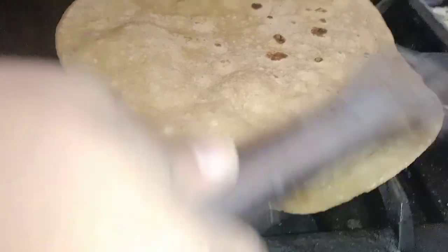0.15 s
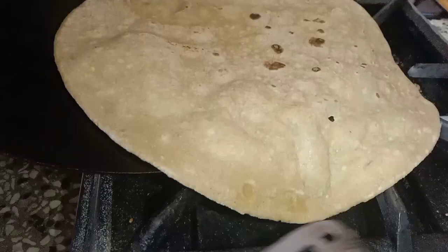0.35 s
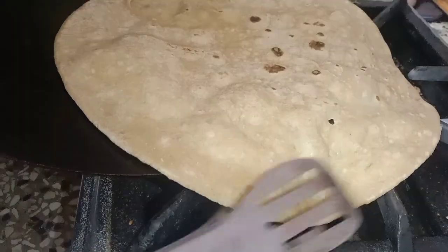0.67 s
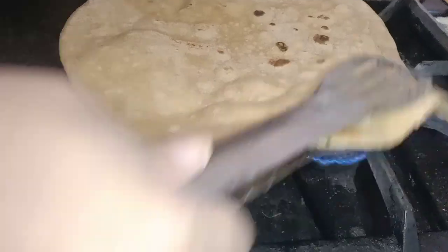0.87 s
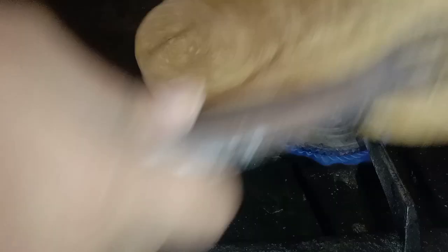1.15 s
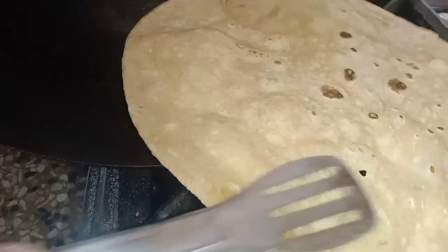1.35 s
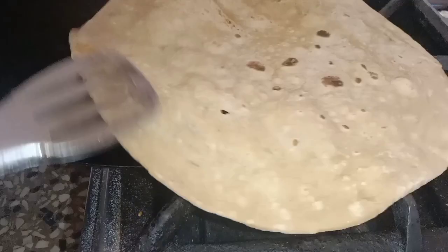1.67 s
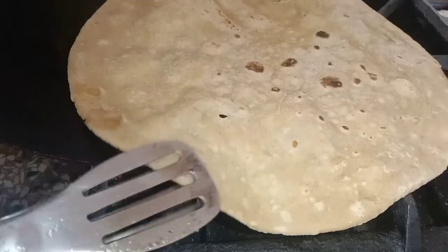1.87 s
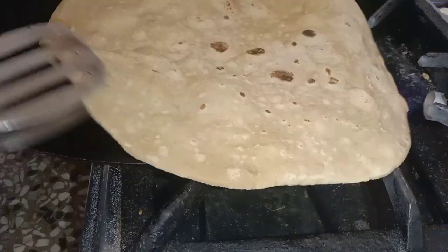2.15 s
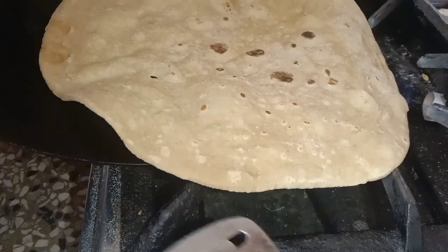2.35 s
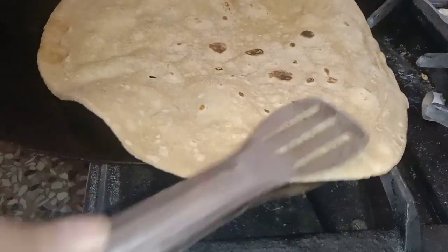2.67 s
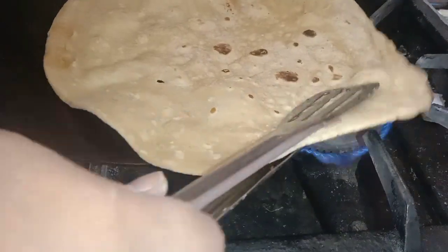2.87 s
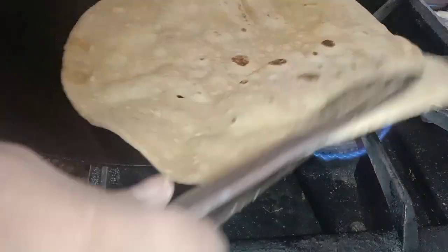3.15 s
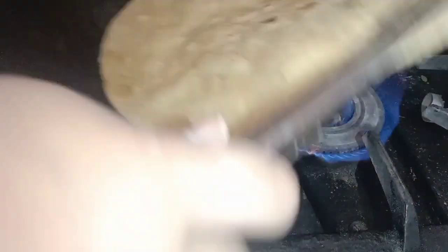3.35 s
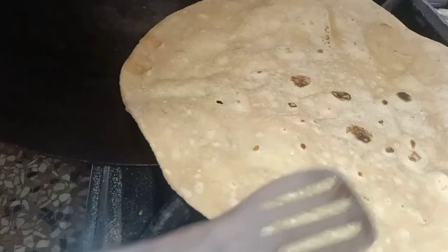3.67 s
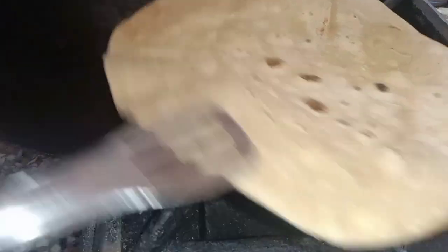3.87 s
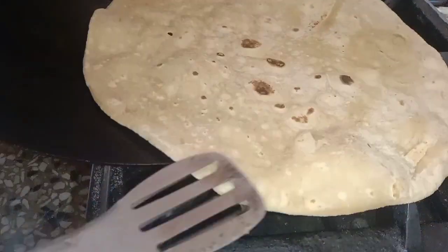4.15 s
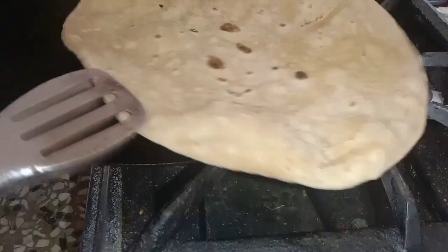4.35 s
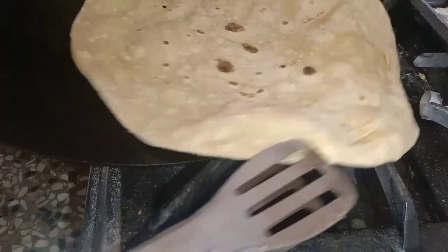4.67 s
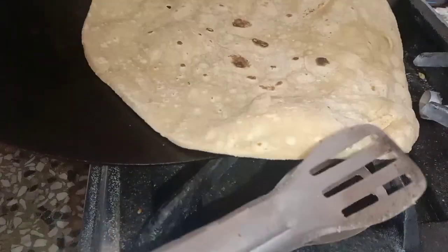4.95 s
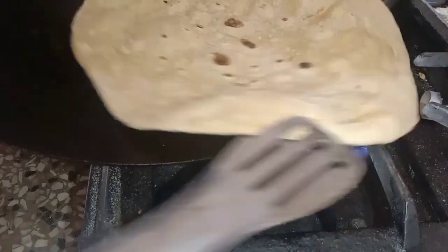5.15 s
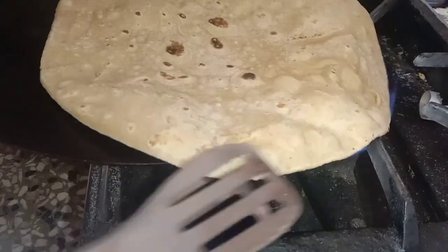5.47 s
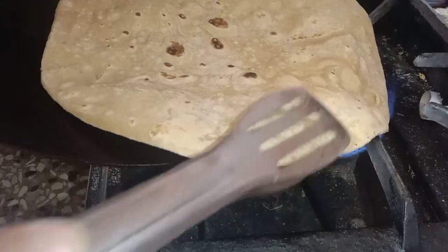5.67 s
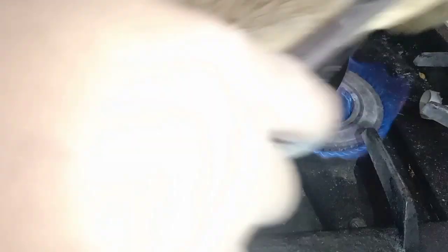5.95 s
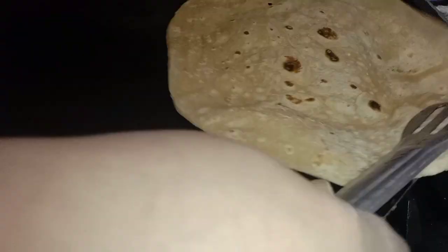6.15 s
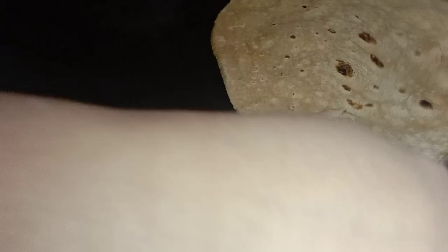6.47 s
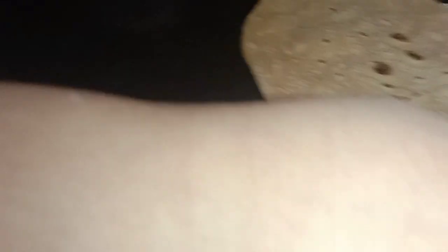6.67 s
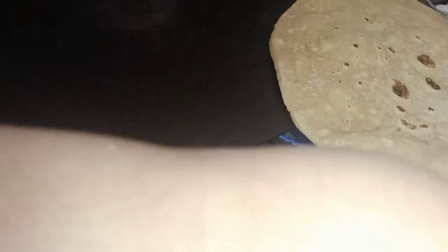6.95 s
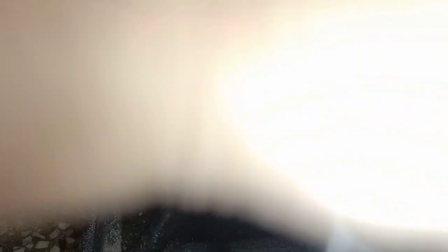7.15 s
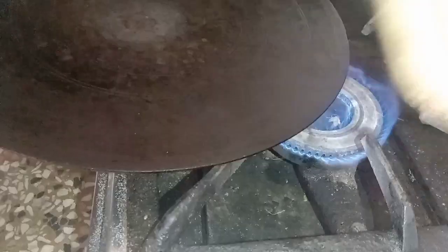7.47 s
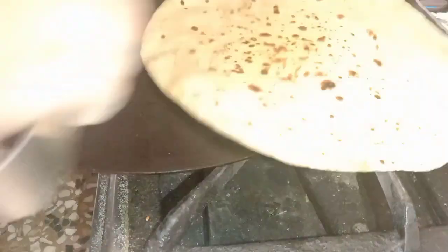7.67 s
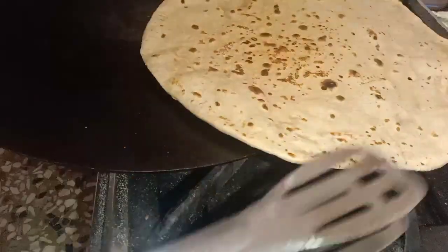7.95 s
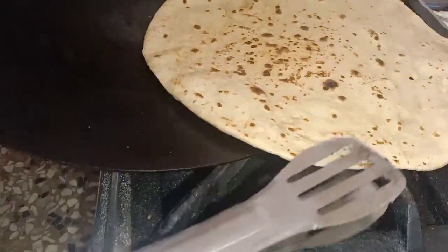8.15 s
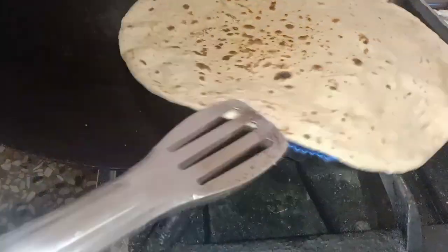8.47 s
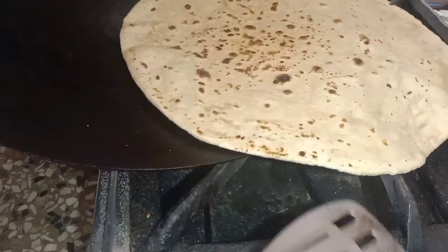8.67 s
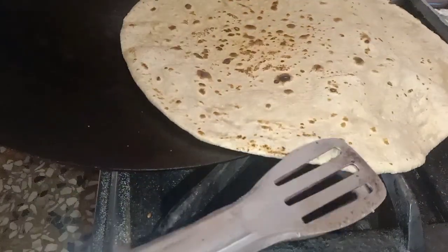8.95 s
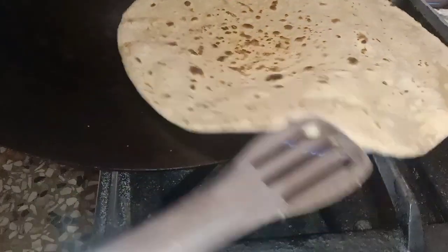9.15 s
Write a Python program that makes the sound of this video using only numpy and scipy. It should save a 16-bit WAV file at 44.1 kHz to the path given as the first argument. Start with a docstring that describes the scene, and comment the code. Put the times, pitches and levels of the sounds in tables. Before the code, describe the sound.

Close dry scrapes, bright spatula clacks and dull griddle thuds as flatbread is turned, while a gas burner hisses and flutters underneath.

```python
"""Spatula and flatbread on an iron griddle

A steel spatula drags a dry flatbread over an iron griddle, skids and taps on the metal, close to a phone.
Grit is random ticks and noise; blade and plate are banks of short decaying modes driven by it.
Skids and taps are chatter bursts; the flame flutters and the plate thuds as swells of low noise.
The gas jet is shaped noise hissing through the burner's resonances.
"""
import sys
import numpy as np
from scipy import signal
from scipy.fft import rfft, irfft, next_fast_len
from scipy.io import wavfile
from scipy.ndimage import uniform_filter1d

SR = 44100
rng = np.random.default_rng(int(sys.argv[2]) if len(sys.argv) > 2 else 0)


def digitize_waveform(pressure):
    """Quantize a signal to 16-bit integers and store it at the path in sys.argv[1].

    Rows of a 2-D input are taken as channels; values are limited to [-1, 1].
    """
    field = np.atleast_2d(pressure).T
    bounded = np.clip(field, -1, 1)
    quanta = np.round(bounded * 32767).astype(np.int16)
    wavfile.write(sys.argv[1], SR, quanta)


N = 410350


# Strokes of bread and blade over the plate, levels before trim:
# (peak time [s], grit level [dB], plate drive level [dB], swell time [s], fade time [s])
STROKES = [(0.9, -40.5, -60.5, 0.97, 0.76), (1.14, -20.5, -43, 0.085, 0.074), (1.28, -27, -54, 0.1, 0.13),
           (1.359, -30.5, -35, 0.13, 0.036), (1.51, -39, -47.5, 0.1, 0.13),
           (1.691, -27.5, -34.5, 0.13, 0.11), (1.81, -39, -72, 0.18, 0.051),
           (2.139, -26, -34, 0.071, 0.087), (2.3, -39, -64, 0.26, 0.11), (2.815, -36, -47.5, 0.025, .07),
           (2.922, -25.5, -26.5, 0.062, 0.058), (3.14, -30.5, -34.5, 0.06, .1),
           (3.42, -36, -52.5, 0.13, 0.23), (3.57, -27, -35, 0.068, 0.11), (3.99, -28.5, -40, 0.21, 0.36),
           (4.38, -30, -37.5, 0.13, .12), (4.62, -37.5, -50.5, 1, 0.093), (4.8, -43, -53, 0.26, 0.19),
           (5.32, -29.5, -39, 0.12, .12), (5.789, -31.5, -35, 0.056, 0.44),
           (6.038, -13.5, -34.5, .05, 0.047), (6.18, -29.5, -33.5, 0.023, 0.087),
           (6.582, -35.5, -44.5, 0.12, .07), (6.78, -41.5, -46.5, 0.17, 0.2), (6.92, -45.5, -50, .3, 0.075),
           (7.29, -38, -51, 0.18, 0.068), (7.67, -30.5, -41.5, 0.042, .11), (7.77, -44.5, -48, 0.079, 0.11),
           (8.16, -47, -69.5, 0.2, 0.36), (8.33, -45, -72, 0.036, 0.035), (8.5, -37, -56, 0.15, 0.15),
           (9.3, -38.5, -59, 0.27, .3)]
# Spectrum of the grit: (frequency [Hz], relative density [dB per Hz])
GRIT_SPECTRUM = [(1060, -40), (1800, -26), (2340, -18.5), (2870, -4.5), (3840, 2), (4150, -6), (5560, -1),
                 (6520, 1), (7340, -2), (8270, -12.5), (9500, -66), (12400, -46), (20900, -120)]
# Blade modes: (frequency [Hz], relative level [dB], undamped t60 [s])
BLADE_MODES = [(2927, -1.5, 0.36), (3600, 1.5, 0.33), (3840, -9, 0.16), (4373, -1.5, 0.37),
               (4870, -29, 0.05), (5200, -6, 0.62), (5430, -10.5, 0.33), (5550, -12.5, 0.078),
               (5670, 2, 0.27), (6240, 0, 0.14), (6077, 4, 0.16), (6300, -7, .12), (6540, 1, .08),
               (6730, 2, 0.22), (6630, -14, 0.07), (6983, 10.5, 0.13), (6980, 4.5, 0.072), (7340, 3, 0.13),
               (7880, -18, .1), (8850, -17, 0.2), (9720, -8, 0.11), (11160, -6.5, 0.066), (10700, -7, 0.11),
               (11800, -11, .08), (13400, -14, .08), (14600, -9, 0.11)]
# Plate modes: (frequency [Hz], relative level [dB], undamped t60 [s])
PLATE_MODES = [(826, -70.5, 0.18), (1015, 4.5, 0.48), (1117, 2.5, 0.37), (1181, 16.5, 0.098),
               (1281, 11.5, 0.074), (1644, 9.5, 0.097), (1792, -4, 0.19)]
REST_GRIT_DB, REST_PLATE_DB = -55.5, -77.5  # the bread creeps and crackles between strokes
PLATE_QUICKER = 1.414  # the plate answers only to the firm middle of a stroke
FINE_DB, FINE_SLOPE_DB_PER_DB = -40, 0.81  # finest grit at a grit level of -30 dB, and its slope


def rubbing():
    """Dry crumbs tick in clusters; the crust's colour wanders; they shake the modes of blade and plate."""
    s, grit_db, plate_db, swell_s, fade_s = np.transpose(STROKES)
    grit_gain = swells(s, grit_db, swell_s, fade_s, REST_GRIT_DB)
    plate_gain = swells(s, plate_db, swell_s / PLATE_QUICKER, fade_s / PLATE_QUICKER, REST_PLATE_DB)

    crumbs = ticks(6000., 0.94) + 1.08 * rng.standard_normal(N)
    force = unit(crumbs * undb(1.4 * walk(150)))

    coloured = colour(force, GRIT_SPECTRUM)
    crust = unit(patchy(coloured, 2004.0, 1.15, count=11, depth_db=2.0, rate_hz=25)) * grit_gain
    blade = undb(-15.5) * ring(force * grit_gain, BLADE_MODES, damp=0.85)

    fine_gain = undb(FINE_DB) * (grit_gain / undb(-30)) ** FINE_SLOPE_DB_PER_DB
    fine = unit(band(force, 8900, 21100)) * fine_gain

    knock = unit(patchy(force, 851.0, 1.2, count=7, depth_db=7.5, rate_hz=14)) * plate_gain
    plate_ring = ring(force * plate_gain, PLATE_MODES, damp=0.53)
    plate = undb(-4.5) * plate_ring + undb(-3.5) * knock
    return undb(-2.0) * (crust + blade) + fine + undb(0.5) * plate


# Blade on metal, taps and longer skids; levels of plate and brightness are relative, before trim:
# (time [s], peak level [dB], plate share [dB], brightness [dB], centre [Hz], contact length [s])
CONTACTS = [(0.433, -30, -34, -7, 6600, 0.0064), (0.5075, -43, -18, 12, 7500, 0.0048),
            (1.115, -16.5, -41, -8, 5920, 0.004), (1.355, -23, -7, -13, 7290, 0.0056),
            (2.802, -29.5, -18, -16, 6750, 0.007), (2.909, -15, -46, 0.5, 5960, 0.007),
            (3.109, -16, -13, -14, 7600, 0.018), (3.5746, -22, -14, -3, 3400, 0.0033),
            (4.137, -7.5, -33, 2, 5640, 0.018), (4.157, -10.5, -20.5, -8, 6560, 0.033),
            (4.2595, -17, -25, -29, 5560, 0.0056), (4.5028, -7.5, -28, -5, 8000, 0.048),
            (4.644, -20.5, -34, -10, 6600, 0.0065), (4.888, -33.5, -25, 3.5, 5520, 0.0043),
            (5.744, -14.5, -21.5, -11, 6400, 0.034), (5.778, -14, -20.5, -9, 6400, 0.046),
            (5.853, -15, -24, -11, 6200, 0.029), (6.1764, -15.5, -5.5, -7.5, 3320, 0.0047),
            (6.551, -11, -20, 1.5, 7040, 0.005), (6.8903, -22, -10.5, -12, 4170, 0.0043),
            (7.043, -37.5, -41, -26, 6500, 0.0047), (7.647, -29, -7, 1, 3570, 0.0059),
            (7.7535, -21, -8.5, -7, 3840, 0.0059)]
RISE_S = 0.00038
HELD, LOOSEN_S = 0.85, 0.064  # share of ring time lost in a firm grip; skid time that loosens it
SPOT_DB, CHATTER_DB = 2.5, 2.2  # chance spread of mode levels; depth of the chatter's level walk


def contacts():
    """Each contact is a chatter burst, quick to rise, lasting while the blade skids, that rings on."""
    out = np.zeros(N + SR)
    t = np.arange(int(.2 * SR)) / SR
    chatter = unit(ticks(5000., 1.1) + rng.standard_normal(N)) * undb(CHATTER_DB * walk(220))
    spots = rng.standard_normal((len(CONTACTS), len(BLADE_MODES)))
    blade_hz = np.array(BLADE_MODES)[:, 0]
    for (s, peak_db, plate_db, bright_db, centre_hz, skid_s), spot in zip(CONTACTS, spots):
        # longer skids ring freer
        ring_share = 1 - HELD * np.exp(-skid_s / LOOSEN_S)
        i = int(s * SR)

        hold = np.exp(-(t / skid_s) ** 3.1)
        attack = (1 + 1.1 * np.exp(-t / 0.0013)) * -np.expm1(-t / RISE_S)
        force = hold * attack * np.resize(chatter[i:], len(t)) + 1e-18  # never exactly zero

        # landing spot favours modes near the centre, and picks among them by chance
        off_centre_db = np.minimum(12.3 * np.log2(blade_hz / centre_hz) ** 2, 14.)
        tilt_db = SPOT_DB * spot - off_centre_db

        crack = band(force, centre_hz / 1.45, centre_hz * 1.39)
        crack = crack + undb(-3.5) * band(band(force, 3000, 8400), 3000, 8500)
        high = crack + undb(0.5) * ring(force, BLADE_MODES, ring_share, tilt_db)
        # short-time peak of crack and blade sets the blow strength
        top = np.sqrt(2 * uniform_filter1d(high ** 2, size=96).max())

        fine = band(force, 8560, 13200) + undb(-1.5) * band(force, 12300, 14600)
        low = ring(force, PLATE_MODES, 0.5) + undb(3.0) * band(force, 690, 1820)
        blow = high + undb(bright_db) * fine + undb(plate_db) * low
        out[i:i + len(t)] += undb(peak_db) / top * blow
    return out[:N]


# Plate thuds under the pressed bread, levels before trim:
# (peak time [s], level [dB], swell time [s], fade time [s], favoured pitch [Hz])
THUDS = [(0.48, -60.5, .08, 0.029, 430), (0.76, -63, 0.055, 0.033, 520), (1.37, -37.5, .03, 0.1, 485),
         (1.73, -55, 0.073, 0.054, 524), (2.13, -60, 0.054, 0.044, 500), (2.33, -65, .06, 0.064, 480),
         (2.93, -50.5, 0.032, .11, 525), (3.12, -48, 0.012, 0.12, 516), (3.619, -44.5, 0.059, 0.072, 432),
         (3.98, -44, 0.017, 0.13, 300), (4.3, -48, 0.035, 0.073, 320), (4.4, -54.5, 0.057, 0.095, 500),
         (4.67, -54.5, 0.025, 0.11, 480), (4.79, -48.5, 0.085, 0.079, 420), (5.3, -51.5, 0.049, 0.23, 530),
         (5.63, -58.5, 0.076, 0.066, 348), (5.8, -50.5, 0.045, 0.24, 525), (6.019, -49, 0.072, .07, 454),
         (6.185, -35, 0.0093, .1, 435), (6.32, -50.5, .1, 0.2, 536), (6.579, -34.5, 0.031, 0.087, 460),
         (6.9, -40.5, 0.016, 0.062, 460), (7.25, -56, 0.088, 0.27, 490), (7.67, -41, .03, 0.09, 500),
         (7.82, -50.5, 0.11, 0.074, 483), (8.6, -62, 0.084, 0.037, 500), (8.91, -50, 0.065, 0.037, 527),
         (9.23, -54.5, 0.085, 0.039, 527)]
# Low plate modes: (frequency [Hz], offset of resting level [dB], undamped t60 [s])
THUD_MODES = [(300, -13.5, 0.097), (395, -20, 0.16), (483.4, -1, 0.15), (524.3, 3.5, 0.13)]
REST_THUD_DB = -75.5
THUD_PICK_DB = 40  # loss of a mode an octave from the favoured pitch


def thuds():
    """The plate thuds dully under the pressed bread; each low mode is driven unevenly."""
    shove = rng.standard_normal(N) * undb(3.54 * walk(30))
    s, db, swell_s, fade_s, pitch_hz = np.transpose(THUDS)
    out = 0
    for mode in THUD_MODES:
        mode_hz, rest_offset_db, _ = mode
        level_db = db - THUD_PICK_DB * np.log2(mode_hz / pitch_hz) ** 2
        gain = swells(s, level_db, swell_s, fade_s, REST_THUD_DB + rest_offset_db)
        out = out + undb(-8.5) * ring(shove * gain * undb(2.6 * walk(5.5)), [mode], damp=0.49)
    return out


# Flame flutters as bread or hand sweeps over it:
# (peak time [s], level [dB], swell time [s], fade time [s])
FLUTTERS = [(1.17, -58, .06, 0.086), (1.36, -47.5, 0.11, 0.091), (1.5, -56, 0.09, 0.1),
            (2.33, -48, .055, .055), (3.57, -51.5, 0.074, 0.096), (4.76, -44.5, .03, 0.075),
            (4.83, -44, .04, 0.027), (5.31, -61.5, 0.058, 0.3), (5.96, -51, .09, .05),
            (6.19, -41.5, .01, .1), (6.35, -52, 0.046, .06), (6.56, -47, .01, 0.082), (6.86, -65, .06, .03),
            (7.27, -61.5, .08, 0.13), (7.5, -64.5, 0.081, 0.072), (7.77, -46.5, 0.037, 0.075)]
# Spectrum of the flutter before its band-pass: (frequency [Hz], relative density [dB per Hz])
FLUTTER_SPECTRUM = [(18, -57), (30, -2), (161, 5.5), (196, -3), (225, -2), (333, -8.5), (400, -26),
                    (520, -54), (880, -120)]
REST_FLUTTER_DB = -75


def flutter():
    """Low band-passed noise swells and wavers as the flame is swept over."""
    rumble = unit(band(colour(rng.standard_normal(N), FLUTTER_SPECTRUM), 83, 570))
    return rumble * swells(*np.transpose(FLUTTERS), REST_FLUTTER_DB) * undb(2.7 * walk(25))


# Level of the gas jet: (time [s], level [dB])
GAS_LEVEL = [(0.0, -47.5), (0.75, -46.5), (1.22, -37.5), (1.35, -70), (1.97, -47), (3.5, -38), (3.65, -48),
             (3.88, -68), (4.09, -41), (4.37, -38), (4.92, -40.5), (5.72, -40), (5.98, -35), (6.24, -43.5),
             (7.22, -45.5), (7.35, -40), (9.3, -41.5)]
# Spectrum of the jet noise: (frequency [Hz], relative density [dB per Hz])
HISS_SPECTRUM = [(18, -62), (30, -25), (144, -31), (945, -39), (1400, -13), (2360, -43.5), (2620, -21),
                 (2910, -2.5), (3230, -12.5), (3880, -4), (4910, -25.5), (6540, -11), (7460, 5),
                 (9430, -13.5), (15500, -2)]
# Burner resonances: (frequency [Hz], width [Hz], mean gain over the hiss [dB])
BURNER = [(1402, 69, 9.5), (1700, 254, 18.5), (2890, 162, 18), (3475, 72, 12.5), (3836, 185, 12.5),
          (4250, 63, 17), (5390, 126, 19.5), (6613, 330, 14.5), (7250, 180, -2.5), (10500, 170, -21)]


def gas():
    """Jet noise: lower bands and top waver apart; burner resonances swell and flicker on their own."""
    jet = colour(rng.standard_normal(N), HISS_SPECTRUM)
    hiss = patchy(jet, 54.9, 1.5, count=12, depth_db=3.0, rate_hz=7)
    hiss = hiss + band(jet, 10600, 20900) * undb(2.5 * walk(12))

    jet = colour(rng.standard_normal(N), HISS_SPECTRUM)
    for hz, width_hz, gain_db in BURNER:
        wander_db = 2.55 * walk(7) + 2.45 * walk(40)
        hiss = hiss + undb(gain_db + wander_db) * band(jet, hz - width_hz / 2, hz + width_hz / 2)
    return unit(hiss) * undb(curves(GAS_LEVEL)[0] + 0.8 * walk(3.2))


SWELL_DB = 15  # slope per swell or fade time, away from the rounded top
ROUNDED = 0.11  # share of swell and fade times over which the top is rounded


def swells(s, db, swell_s, fade_s, rest_db):
    """Gain that rises to each peak and falls away, steadily in dB, over a resting level."""
    power = np.full(N, undb(rest_db) ** 2)
    for peak_s, top_db, up_s, down_s in zip(s, db, swell_s, fade_s):
        a, b = (int(np.clip(e * SR, 0, N)) for e in (peak_s - 4 * up_s, peak_s + 4 * down_s))
        late_s = np.arange(a, b) / SR - peak_s
        distance = np.maximum(late_s / down_s, -late_s / up_s)
        drop_db = SWELL_DB * (np.hypot(distance, ROUNDED) - ROUNDED)
        power[a:b] += undb(2 * (top_db - drop_db))
    return np.sqrt(power)


def ring(x, modes, damp=0.99, tilt_db=0.):
    """Sum of decaying modes, t60 times damp; white rms 1 in gives rms 1 out if tilt_db, per mode, is 0."""
    out, power = 0, 0
    for (hz, db, t60_s), extra_db in zip(modes, tilt_db + np.zeros(len(modes))):
        r = np.exp(-np.log(1000) / (t60_s * damp * SR))
        poles = [1, -2 * r * np.cos(2 * np.pi * hz / SR), r * r]
        out = out + undb(db + extra_db) * signal.lfilter([.5, 0, -.5], poles, x)
        power += undb(db) ** 2 / (2 * (1 - r * r))
    return out / np.sqrt(power)


def ticks(rate_hz, spread_db):
    """Random ticks of uneven size, rms 1."""
    hit = rng.random(N) < rate_hz / SR
    return unit(hit * rng.standard_normal(N) * undb(spread_db * rng.exponential(size=N)))


def patchy(x, lo_hz, step, count, depth_db, rate_hz):
    """Split into bands whose levels wander on their own."""
    edges = lo_hz * step ** np.arange(count + 1)
    return sum(band(x, a, b) * undb(depth_db * walk(rate_hz)) for a, b in zip(edges, edges[1:]))


def walk(rate_hz):
    """Random levels held 1 / rate_hz s and slewed; spread near 1."""
    held = np.repeat(rng.standard_normal(int(N / SR * rate_hz) + 2), 4)
    knots = uniform_filter1d(held, size=4)
    return 1.2 * np.interp(np.arange(N) * (4 * rate_hz / SR), np.arange(len(knots)), knots)


def colour(x, points):
    """Filter by a (frequency [Hz], level [dB]) spectrum, straight in log frequency."""
    size = next_fast_len(N)
    hz = np.arange(1, size // 2 + 2) * SR / size
    p = np.array(points)
    gain = undb(np.interp(np.log(hz), np.log(p[:, 0]), p[:, 1]))
    return irfft(rfft(x, size) * gain, size)[:N]


def band(x, lo_hz, hi_hz):
    """Causal band-pass."""
    return signal.sosfilt(signal.butter(2, [lo_hz, hi_hz], "band", fs=SR, output="sos"), x)


def curves(table):
    """Columns of a table joined by straight lines in time."""
    s, *columns = np.transpose(table)
    return [np.interp(np.arange(N) / SR, s, c) for c in columns]


def unit(x):
    """Scale to rms 1."""
    return x / np.sqrt(np.mean(x ** 2))


def undb(db):
    """Decibels to amplitude gain."""
    return np.exp(np.asarray(db) * (np.log(10) / 20))


def scene():
    """Everything at one microphone."""
    return (rubbing() + contacts() + thuds() + flutter() + gas())[None]


# Response of the phone's ports: (frequency [Hz], level [dB])
MIC_RESPONSE = [(20, 1), (600, -2), (720, -7), (830, 1.5), (2050, 1), (2350, -1.5), (2650, -0.5),
                (13000, -0.5), (15300, 0.5)]
TOP_HZ = 15500


def record(dry):
    """The phone's ports colour the sound, with a dip in the low mids; a steep low-pass cuts the top."""
    low_pass = signal.ellip(16, .3, 70, TOP_HZ, fs=SR, output="sos")
    return signal.sosfilt(low_pass, colour(dry[0], MIC_RESPONSE)[None])


dry = scene()
out = record(dry)
digitize_waveform(out)
```